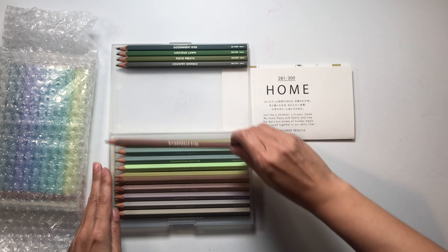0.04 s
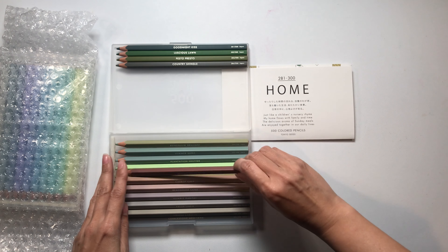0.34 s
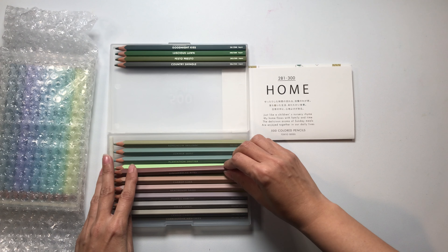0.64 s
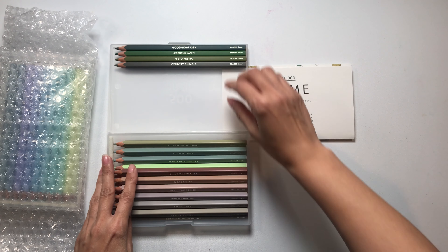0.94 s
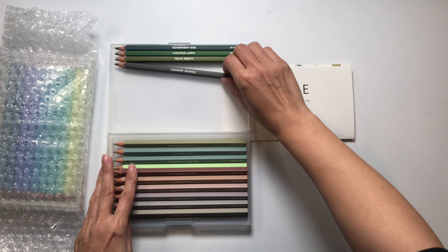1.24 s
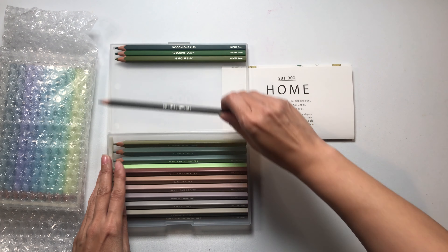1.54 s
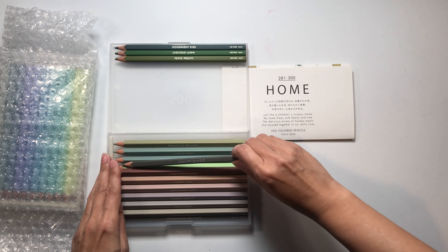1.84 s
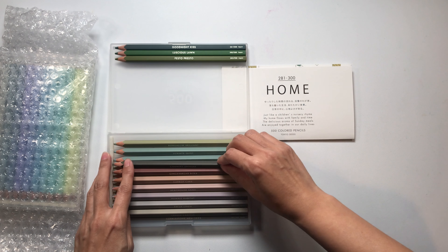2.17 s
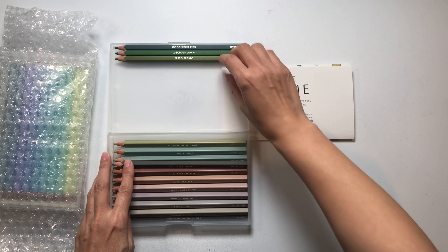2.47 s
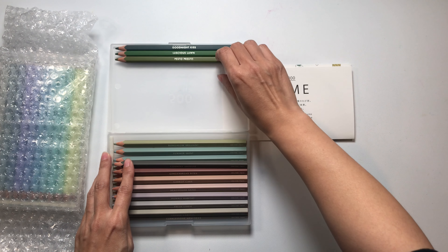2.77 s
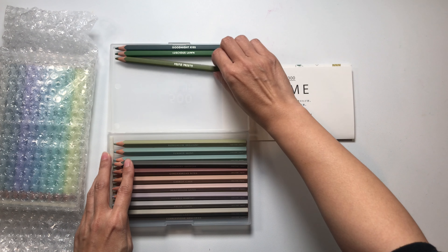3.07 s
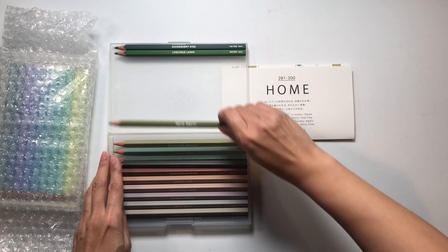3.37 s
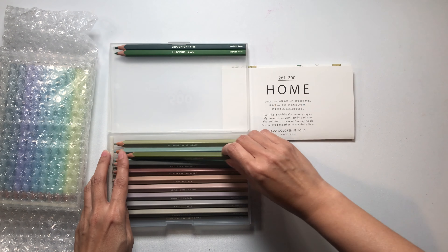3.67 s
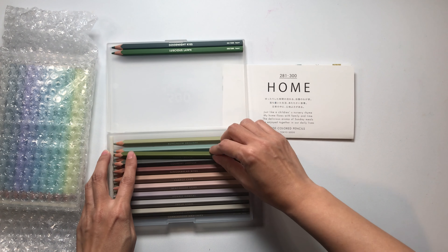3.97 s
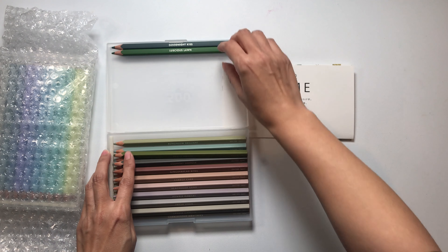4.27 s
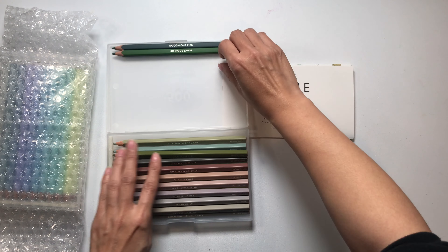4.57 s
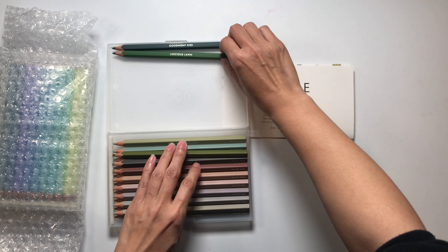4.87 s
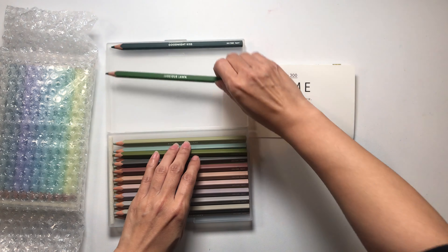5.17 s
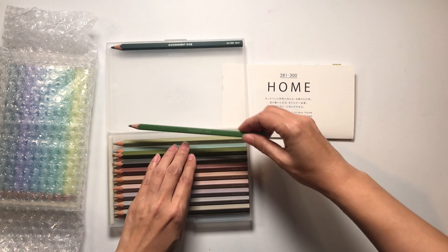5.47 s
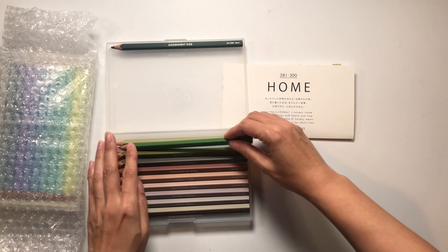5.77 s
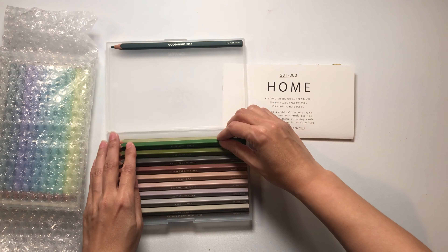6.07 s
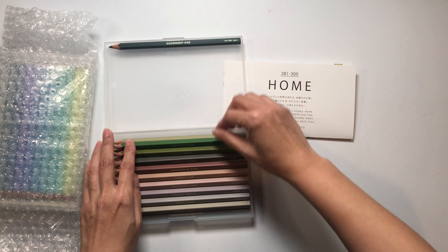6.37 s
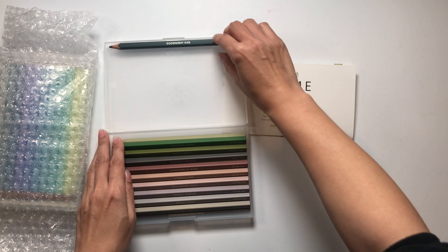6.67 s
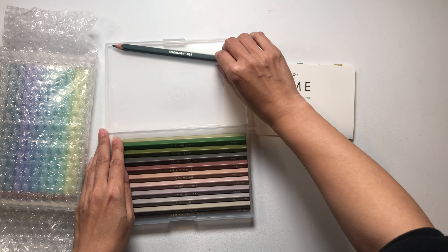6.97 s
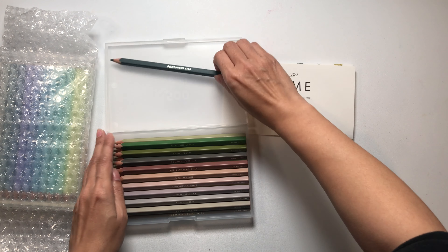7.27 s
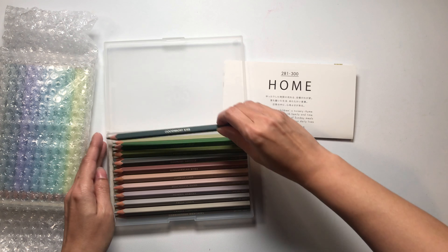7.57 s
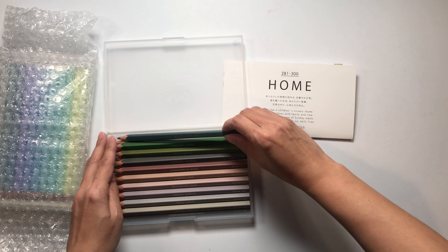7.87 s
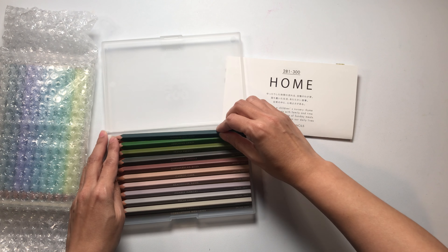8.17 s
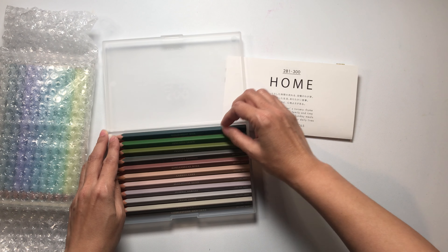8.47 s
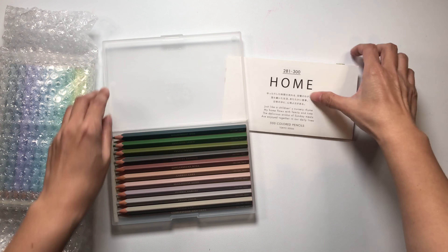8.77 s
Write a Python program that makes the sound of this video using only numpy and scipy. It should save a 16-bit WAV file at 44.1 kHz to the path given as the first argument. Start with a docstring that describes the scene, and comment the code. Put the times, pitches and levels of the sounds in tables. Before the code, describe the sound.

Colored pencils are moved one at a time from the open lid of a plastic case into its tray. Each knocks about in the hollow lid, sometimes with a dull desk thud, then lands, slides against its neighbors and clicks into place. At the end a hand bumps the case and brushes over card. The microphone is above the desk in a small room with faint hum and hiss.

```python
"""A desk in a small room, microphone above it. Coloured pencils go one by one from the open lid of a
plastic case into its tray. Fingers knock each pencil about in the hollow lid, lay it down, slide it
along its neighbours and click it into its slot: knocks ring the plastic, rubbing hisses and rings the
groove between the pencils. The hand's weight thuds into the desk, and at the end a hand bumps the
case and brushes over card. Mains hum, building rumble and a soft hiss lie underneath."""
import sys
import numpy as np
from scipy import signal
from scipy.fft import rfft, irfft
from scipy.io import wavfile
from scipy.ndimage import uniform_filter1d

SR = 44100
rng = np.random.default_rng(int(sys.argv[2]) if len(sys.argv) > 2 else 0)


def wav_record(signal):
    """Record a signal, one row per channel, as 16-bit PCM in the file named by sys.argv[1]."""
    frames = np.transpose(np.atleast_2d(signal))
    bounded = np.clip(frames, -1, 1)
    # unit amplitude maps onto the largest positive 16-bit level
    quanta = np.round(bounded * 32767).astype(np.int16)
    wavfile.write(sys.argv[1], SR, quanta)


N = 398171

# A pencil is drawn out over the lid. Each row: start in seconds, length in seconds, relative level in dB.
LID_DRAGS = [(-0.02, 0.14, -67), (1.253, 0.18, -64), (1.564, 0.16, -71), (2.83, 0.45, -64.5),
             (4.777, 0.36, -65.5), (5.219, 0.073, -56.5), (6.816, 0.6, -63)]
# A pencil lands or snaps into the full tray. Each row: start in seconds, strength in dB,
# weight behind it in dB, hardness of the contact in dB, note of the held pencil in Hz.
TRAY_HITS = [(0.2468, 4, 5.5, 4, 2900), (0.7715, -28.5, 7, 16.5, 4560), (0.5022, -15, 9, 3.5, 2300),
             (0.8504, -15, 6, -1.5, 1460), (1.8011, 6.5, 2, 1.5, 3170), (1.812, -0.5, -6, -18, 1020),
             (2.1525, -5, 2, 10, 3250), (3.5475, -7, 1, 3, 3840), (3.5769, -5.5, 8, -7, 2660),
             (3.6074, 6, -0.5, -13.5, 1450), (3.8236, -6.5, -4, 6.5, 1280), (3.9205, -5, -2, 13.5, 2140),
             (4.0656, -15.5, 18, -21, 1030), (5.366, 8, 1.5, 10, 1730), (5.6152, 6.5, -5.5, -8, 3130),
             (5.9537, -16.5, 8, -20, 1020), (6.069, -8, 8, -5.5, 1480), (6.1143, -19, 10, -2, 1250),
             (6.2511, -11.5, 2, -13.5, 1140), (6.198, -24, -3, 7, 4600), (6.3547, -20, 8, 6, 4350),
             (7.71, -7, 6.5, -0.5, 1520), (7.8252, -1, 5, -2, 664), (7.8776, 4, -5, -13.5, 1610),
             (8.1825, 0.5, -1, 6, 2570), (8.4525, -11.5, -4, -3, 1000), (8.483, -36, 15, 27, 6550),
             (8.799, -16.5, 16, -2, 2140)]
# A pencil is worked into its slot along its neighbours. Each row: start and length in seconds,
# relative levels of groove ring and of hiss in dB, note of the groove in Hz, its rise in octaves.
TRAY_SLIDES = [(0.322, 0.065, -59.5, -64, 1130, -0.2), (0.384, 0.25, -66.5, -70, 990, -0.25),
               (0.671, 0.16, -69, -60.5, 1280, 0.097), (1.821, 0.33, -57, -71, 1110, 0.16),
               (3.618, 0.28, -57.5, -58, 1140, 0.18), (5.683, 0.236, -60.5, -66.5, 1240, 0.5),
               (5.972, 0.16, -83, -69, 1100, 0), (6.167, 0.07, -68, -60.5, 1200, -0.099),
               (7.747, 0.115, -65, -59, 1160, 0.2), (8.019, 0.19, -71, -65.5, 1140, 0.039),
               (8.218, 0.26, -66, -70, 1140, -0.047), (8.409, 0.054, -57.5, -57.5, 1090, -0.16)]


def amp(db):
    """Decibels to gain."""
    return 10 ** (np.asarray(db) / 20)


def unit_rms(x):
    """Scales to rms 1."""
    return x / np.sqrt(np.mean(x ** 2) + 1e-20)


def curve_at(points, hz):
    """Reads a curve on a log-frequency axis."""
    points_hz, values = np.transpose(points)
    return np.interp(np.log(hz + 1), np.log(points_hz + 1), values)


def add(mix, start_s, sound):
    """Mixes a sound in at its start time."""
    part = mix[max(round(start_s * SR), 0):][:len(sound)]
    part += sound[:len(part)]


def coloured(x, *spectra, size=4096):
    """Causal filter whose gain is the sum of the given dB spectra."""
    hz = abs(np.fft.fftfreq(size, 1 / SR))
    log_gain = np.log(amp(sum(curve_at(points, hz) for points in spectra)))
    taps = np.fft.ifft(np.exp(np.conj(signal.hilbert(log_gain)))).real
    return signal.fftconvolve(x, taps[:size // 2])[:len(x)]


def decay(t, t60):
    """Envelope that loses 60 dB in t60 seconds."""
    return np.exp(-np.log(1000) * t / t60)


def room_tone(air_db=-59.5, mains_hz=50, mains_db=-52):
    """The still room: even hiss, narrow bands of low rumble and of wavering mains hum near 50 and 157 Hz, and a
    steady 50 Hz hum."""
    # Each row: frequency in Hz, relative density of the hiss in dB.
    air_colour = [(40, -12), (85, -16.5), (120, -9.5), (160, -10.5), (190, -19), (270, -16.5), (420, -22),
                  (600, -26), (1250, -30), (1900, -33), (4000, -37), (9000, -39), (16000, -46)]
    # Each row: centre in Hz, width in Hz, level in dB.
    narrow_bands = [(16.5, 9.2, -52.5), (30.8, 2.5, -57.5), (50.6, 13, -58.5), (156.86, 5.7, -63.5),
                    (248, 27, -79.5)]
    hz = np.fft.rfftfreq(N, 1 / SR)
    air_spectrum = rfft(rng.standard_normal(N)) * amp(curve_at(air_colour, hz))
    out = amp(air_db) * unit_rms(irfft(air_spectrum, N))
    for centre_hz, width_hz, db in narrow_bands:
        band = np.exp(-2 * ((hz - centre_hz) / width_hz) ** 2)
        phases = np.exp(2j * np.pi * rng.random(len(hz)))
        out += amp(db) * unit_rms(irfft(band * phases, N))
    hum = np.sin(2 * np.pi * mains_hz * np.arange(N) / SR)
    return out + amp(mains_db) * unit_rms(hum)


def friction(length_s, catches_per_s, catch_db, spread_db, uneven_db, taper, smoothing=500):
    """A stroke under uneven pressure: fine hiss with small catches, swelling and fading."""
    count = max(int(length_s * SR), 64)
    hiss, pressure = rng.standard_normal((2, count))
    pressure = unit_rms(uniform_filter1d(uniform_filter1d(pressure, smoothing), smoothing))
    caught = rng.random(count) < catches_per_s / SR
    catch_gain = amp(catch_db + spread_db * np.minimum(rng.exponential(1, count), 3))
    catches = caught * np.sign(hiss) * catch_gain
    return (hiss + catches) * amp(uneven_db * pressure) * signal.windows.tukey(count, taper)


def rubbed_resonance(strokes, width_hz, uneven_db, skirt_db=-14):
    """Friction rings one resonance, whose note can glide over the stroke."""
    out = np.zeros(N)
    for start, length, db, note_hz, octaves in strokes:
        drive = friction(length, 410, catch_db=1.0, spread_db=8.5, uneven_db=uneven_db, taper=0.49)
        hz = note_hz * 2 ** (octaves * np.linspace(-.5, .5, len(drive)))
        # shift the note down to 0 Hz, low-pass, shift back: a gliding band-pass
        carrier = np.exp(2j * np.pi * np.cumsum(hz) / SR)
        pole = np.exp(-np.pi * width_hz / SR)
        skirt = signal.lfilter([1 - pole], [1, -pole], drive / carrier)
        core = signal.lfilter([1 - pole], [1, -pole], skirt)
        ring = (carrier * (core + amp(skirt_db) * skirt)).real
        add(out, start, amp(db) * unit_rms(ring))
    return out


def sliding_notes(lid_hz=1040, lid_ring_db=-6):
    """The lid sings jerkily under a dragged pencil; in the tray the groove's note glides as it settles."""
    slides = [(start, length, db, hz, octaves) for start, length, db, _, hz, octaves in TRAY_SLIDES]
    drags = [(start, length, db + lid_ring_db, lid_hz, 0) for start, length, db in LID_DRAGS]
    groove = rubbed_resonance(slides, width_hz=330, uneven_db=2.1)
    return groove + rubbed_resonance(drags, width_hz=200, uneven_db=8.5)


def dry_rubbing(strokes, colour, grains_per_s, grain_db, uneven_db):
    """Grainy rubbing; each stroke has its own treble tilt, as a quicker stroke is brighter."""
    out = np.zeros(N)
    for start, length, db, db_per_octave in strokes:
        drive = friction(length, grains_per_s, grain_db, spread_db=3.0, uneven_db=uneven_db, taper=0.4)
        tilt = [(1000, 0), (16000, db_per_octave * np.log2(16))]
        add(out, start, amp(db) * unit_rms(coloured(drive, colour, tilt)))
    return out


def crinkled(x, patchy_db, size=9):
    """Each tiny contact sounds in its own band, so the hiss breaks into short patches."""
    spectra = signal.stft(x, nperseg=256)[2]
    patches = uniform_filter1d(rng.standard_normal(spectra.shape), size, axis=0)
    patches = unit_rms(uniform_filter1d(patches, size // 2, axis=1))
    return signal.istft(spectra * amp(patchy_db * patches), nperseg=256)[1][:N]


def pencil_scuffs(snap_hardness_db=7.5, lead_in_s=0.033):
    """The dry hiss of grabbing, dragging and sliding excites the pencil's bending modes."""
    # Fingers rummage in the lid. Each row: start in seconds, length in seconds, relative level in dB.
    grabs = [(1.122, 0.18, -49.5), (2.567, 0.095, -48.5), (4.367, 0.22, -48)]
    # Each row: frequency in Hz, width in Hz, gain in dB over the plain hiss.
    bending_modes = [(4600, 350, 3), (7250, 450, 6), (9900, 500, 5)]
    # the last number of each stroke is its tilt in dB per octave
    strokes = [(start, length, db, -2.0) for start, length, db in grabs]
    strokes += [(start, length, db, 2.1) for start, length, db in LID_DRAGS]
    strokes += [(start, length, hiss_db, 2.0) for start, length, _, hiss_db, _, _ in TRAY_SLIDES]
    # a hard contact is a snap: the pencil scrapes just before it slips in
    strokes += [(start - lead_in_s, lead_in_s, -64, 5)
                for start, _, _, hardness_db, _ in TRAY_HITS if hardness_db > snap_hardness_db]
    # Each row: frequency in Hz, gain in dB.
    scuff_colour = [(100, -6), (500, 5.5), (1300, 6), (2200, 2.5), (3500, -4.5), (6000, -10.5),
                    (9500, -14.5), (11500, -21), (16000, -20)]
    hiss = dry_rubbing(strokes, scuff_colour, grains_per_s=83, grain_db=18.0, uneven_db=3)
    hiss = crinkled(hiss, patchy_db=3.0)
    return hiss + sum(amp(db) * signal.lfilter(*signal.iirpeak(hz, hz / width, fs=SR), hiss)
                      for hz, width, db in bending_modes)


def dense_modes(t, crack_t60, buzz_db, buzz_t60, soft_hz=4200):
    """A sharp impact, then a plastic shell's crowded modes, treble dying first; flat in spectrum."""
    buzz = rng.standard_normal(len(t)) * (decay(t, crack_t60) + amp(buzz_db) * decay(t, buzz_t60))
    crack = signal.lfilter(*signal.butter(1, soft_hz, fs=SR), buzz)
    crack += 0.38 * rng.standard_normal(len(t)) * decay(t, 0.012)
    crack[0] = 2.4  # the impact itself
    spectrum = rfft(crack, 2 * len(t))
    smooth_power = uniform_filter1d(abs(spectrum) ** 2, 121, mode="reflect")
    return irfft(spectrum / np.sqrt(smooth_power + 1e-12))[:len(t)]


def knocks(hits, modes, colour, crack_t60, buzz_db, buzz_t60, note_db, note_spread,
           clack_db, clack_share, cushioned_db=-10.5):
    """Each blow rings pencil and shell; weight adds thump, a hard contact adds clack and tick."""
    out, t = np.zeros(N), np.arange(6000) / SR
    for start, strength_db, weight_db, hardness_db, note_hz in hits:
        # the fingers damp the pencil, so its own note is only a broad bump on the crack
        note = [(note_hz / (1 + note_spread), 0), (note_hz, note_db), (note_hz * (1 + note_spread), 0)]
        ring = coloured(dense_modes(t, crack_t60, buzz_db, buzz_t60), note)
        for hz, db, t60 in modes:
            detune, phase = rng.uniform(-1, 1, 2)
            # a longer ring starts lower for the same resonance peak
            height = amp(db) * 2 * np.log(1000) / (t60 * SR)
            tone = np.sin(2 * np.pi * hz * (1 + 0.013 * detune) * t + np.pi * phase)
            ring += height * decay(t, t60) * tone
        cushion_db = min(hardness_db - cushioned_db, 0)  # a fingertip takes the clack off a soft contact
        mid_db = clack_db + clack_share * hardness_db + cushion_db
        contact = [(100, 0), (370, weight_db), (900, 0), (1800, 0.0046),
                   (3000, mid_db), (7000, hardness_db)]
        # a strong, hard blow reaches the highest treble
        snap = [(9000, 0), (13000, np.clip(3.5 * (strength_db + hardness_db - 8.5), 0, 8))]
        add(out, start, amp(strength_db) * coloured(ring, colour, contact, snap))
    return out


def tray_clicks():
    """Pencils land in the tray and ring it; their bending modes stand out as broad humps."""
    # Each row: frequency in Hz, level in dB over the dense modes, 60 dB decay time in seconds.
    tray_modes = [(988, 7, 0.043), (1098, 4.5, 0.055), (1220, -3.5, 0.13), (1804, 9, 0.084),
                  (1965, 1.5, 0.04), (2850, -3, 0.08), (5610, -1.5, 0.032), (7560, -2.5, 0.015),
                  (9200, -11, 0.077)]
    # Each row: frequency in Hz, gain in dB.
    tray_colour = [(40, -0.5), (150, -7.5), (600, -5), (1200, 0), (2350, -8.5), (3000, -8), (3900, -12.5),
                   (4800, -12.5), (6100, -15.5), (7250, -11.5), (8600, -20.5), (9800, -18.5),
                   (11800, -30.5), (16000, -44)]
    return knocks(TRAY_HITS, tray_modes, tray_colour, crack_t60=0.022, buzz_db=-19.5, buzz_t60=0.14,
                  note_db=9.0, note_spread=0.29, clack_db=4.0, clack_share=0.28)


def lid_knocks(bounce_above_db=-2.5, bounce_s=0.0052, bounce_db=-12.5):
    """Pencils knock about in the hollow, springy lid; a strong blow bounces once."""
    # Each row: start in seconds, strength, weight and hardness in dB, note of the held pencil in Hz.
    hits = [(1.1264, -7.5, -4, -3.5, 1017), (1.138, -6, 4.5, 1, 1170), (1.148, -6, 8, 1.5, 1040),
            (1.1695, -9, -4, 10, 2730), (1.2063, -8.5, -7, 5, 1100), (1.2337, -1, 4.5, 5, 1960),
            (1.4068, -15, 2, 9, 3300), (2.5727, -10, -4, -7, 990), (2.599, -3.5, 3.5, 1, 4950),
            (2.6016, 0, -9, 5, 2660), (2.6675, -12, 1, 11, 3270), (2.7145, -9.5, -7, -5.5, 1090),
            (2.9373, -19, 5, -6, 970), (2.9792, -7.5, 9, 0.5, 1790), (3.0585, -18, 5, -2, 840),
            (4.395, -10.5, 1, -2, 960), (4.4215, 1.5, 10.5, 7.5, 685), (4.4783, -18.5, -3, 28, 8000),
            (4.5112, -3, 11, 4, 3280), (4.5212, 5, -6, 12, 1760), (4.8036, -18.5, -3, 3, 965),
            (4.9148, -4, -4, -7, 2040), (5.0326, -19.5, -9, 5, 950), (5.0655, -9, -13, -14.5, 1320),
            (5.1368, -16, -1, 1, 3230), (6.7147, -18.5, 9, -3, 1070), (6.8484, -18, -10, 3, 1340),
            (6.8908, -5.5, 2, -1.5, 725), (7.0794, -16.5, 4, 2.5, 3180), (7.1029, -3.5, -2, -16.5, 790)]
    # Each row: frequency in Hz, level in dB over the dense modes, 60 dB decay time in seconds.
    lid_modes = [(274, 0.96, 0.081), (605, 2.2, 0.14), (850, 0.7, 0.049), (1024, 13.4, 0.074),
                 (1486, 7.7, 0.017), (1784, 8, 0.055), (2060, 7.9, 0.14), (3150, 1, 0.13), (4510, 2, 0.013)]
    # Each row: frequency in Hz, gain in dB.
    lid_colour = [(40, -2.5), (150, 4.5), (300, 0.5), (700, 0), (1050, 0.5), (1500, -7), (2200, -4.5),
                  (3200, -8.5), (4500, -11.5), (7000, -13.5), (10000, -22), (12500, -36), (16000, -41)]
    bounces = [(start + bounce_s, db + bounce_db, 0, hardness_db, note_hz)
               for start, db, _, hardness_db, note_hz in hits if db > bounce_above_db]
    return knocks(hits + bounces, lid_modes, lid_colour, crack_t60=0.029, buzz_db=-17.5, buzz_t60=0.13,
                  note_db=7.0, note_spread=0.26, clack_db=3.0, clack_share=0.42)


def thumps(blows, modes, rise_s):
    """Soft blows ring the low modes of a large body."""
    out, t = np.zeros(N), np.arange(SR // 2) / SR
    ring = sum(amp(db) * decay(t, t60) * np.sin(2 * np.pi * hz * t) for hz, db, t60 in modes)
    for start, db in blows:
        add(out, start, amp(db) * ring * (1 - np.exp(-t / rise_s)))
    return out


def desk_thuds():
    """The hand's weight reaches the desk and rings its low modes."""
    # Each row: start in seconds, relative level in dB.
    thuds = [(1.14, -49), (2.605, -41), (4.425, -45.5), (4.52, -46), (8.8, -57)]
    # Each row: frequency in Hz, gain in dB, 60 dB decay time in seconds.
    desk_modes = [(31.5, 4, 0.56), (73, 8.5, 0.13), (123, -11, 0.094), (215, -13, 0.065)]
    return thumps(thuds, desk_modes, rise_s=0.007)


def skin_brushes():
    """Skin brushes over card and plastic with a fine, patchy hiss."""
    # Each row: start and length in seconds, relative level in dB, treble tilt in dB per octave.
    strokes = [(5.098, 0.036, -60.5, -3.5), (7.18, 0.078, -57, -1), (8.478, 0.026, -59, 13),
               (8.54, 0.15, -57, -1.5), (8.82, 0.078, -61.5, -9.5), (8.885, 0.093, -55, -3.5),
               (8.96, .14, -57.5, -4)]
    # Each row: frequency in Hz, gain in dB.
    skin_colour = [(200, -6), (1500, -9.5), (3000, -2.5), (5500, 1), (7500, 6), (10000, 5), (12500, -1),
                   (16000, -3)]
    hiss = dry_rubbing(strokes, skin_colour, grains_per_s=400, grain_db=10.5, uneven_db=-1.5)
    return crinkled(hiss, patchy_db=3.5)


def case_bumps():
    """The bumped case judders over the desk, ringing at each contact."""
    # Each row: start in seconds, relative level in dB.
    bumps = [(8.799, -38.5), (8.868, -54), (8.915, -49), (8.958, -50.5)]
    # Each row: frequency in Hz, gain in dB, 60 dB decay time in seconds.
    case_modes = [(143, -6, 0.18), (200, -2.5, 0.16), (272.8, 2.5, 0.23), (354, 6, 0.017),
                  (460, -6.5, 0.09), (714, -18.5, 0.25), (1240, -19, 0.21)]
    return thumps(bumps, case_modes, rise_s=0.00042)


def small_room(x, tail_db=-11.0, build_up_s=0.00058, wall_s=0.01207, wall_spread_s=0.002, wall_db=-13):
    """The direct sound, a scattered echo off the nearest wall and a short diffuse tail."""
    # Each row: frequency in Hz, gain in dB.
    tail_colour = [(200, 12), (700, 0.5), (1300, -0.5), (1900, 5), (2600, -0.5), (3400, -2.5), (5300, -2),
                   (6500, -3.5), (9000, 0), (15000, 0.5)]
    # Each row: frequency in Hz, 60 dB decay time in seconds.
    tail_t60 = [(150, 0.18), (600, 0.38), (1900, 0.3338), (3300, 0.35), (5300, 0.43), (9000, 0.27),
                (15000, 0.31)]
    hz, t, spectra = signal.stft(rng.standard_normal(SR // 2), SR, nperseg=256)
    spectra *= amp(curve_at(tail_colour, hz))[:, None]
    spectra *= decay(t, curve_at(tail_t60, hz)[:, None])
    tail = signal.istft(spectra, SR, nperseg=256)[1]
    t = np.arange(len(tail)) / SR
    tail *= 1 - np.exp(-(t / build_up_s) ** 2)
    wall = rng.standard_normal(len(t)) * np.exp(-((t - wall_s) / wall_spread_s) ** 2)
    response = amp(tail_db) * tail / np.linalg.norm(tail) + amp(wall_db) * wall / np.linalg.norm(wall)
    return x + signal.fftconvolve(x, response)[:N]


def scene():
    """All the handling, heard in mono from above the desk."""
    clicks = tray_clicks() + lid_knocks()
    rubbing = amp(-4.0) * pencil_scuffs() + amp(0.5) * skin_brushes() + sliding_notes()
    # the low thumps travel through the desk, not through the air of the room
    lows = amp(1.0) * (desk_thuds() + case_bumps())
    return (small_room(clicks + rubbing) + lows + room_tone())[None]


def record(dry):
    """The recorder's band limit."""
    low_pass = signal.firwin(401, cutoff=16100, window=("kaiser", 9), fs=SR)
    return signal.oaconvolve(dry, low_pass[None], "same")


dry = scene()
out = record(dry)
wav_record(out)
```